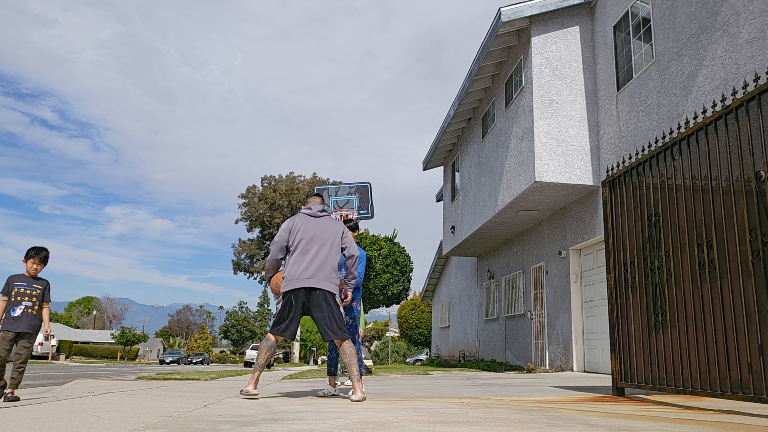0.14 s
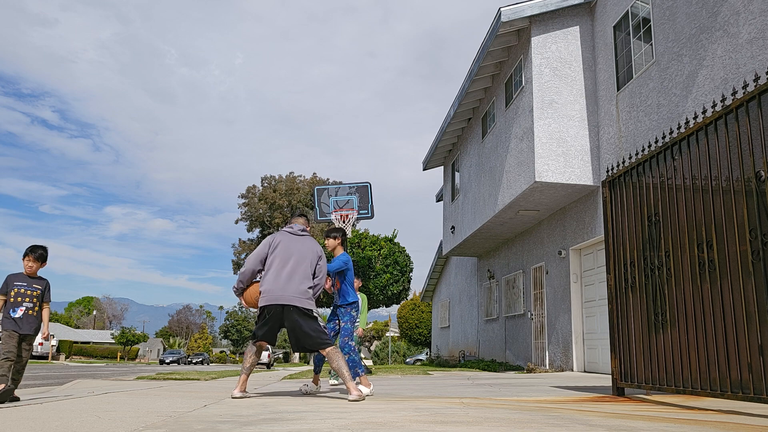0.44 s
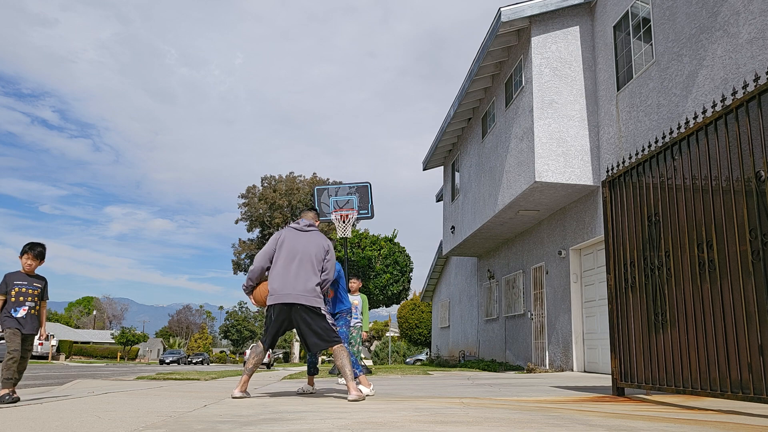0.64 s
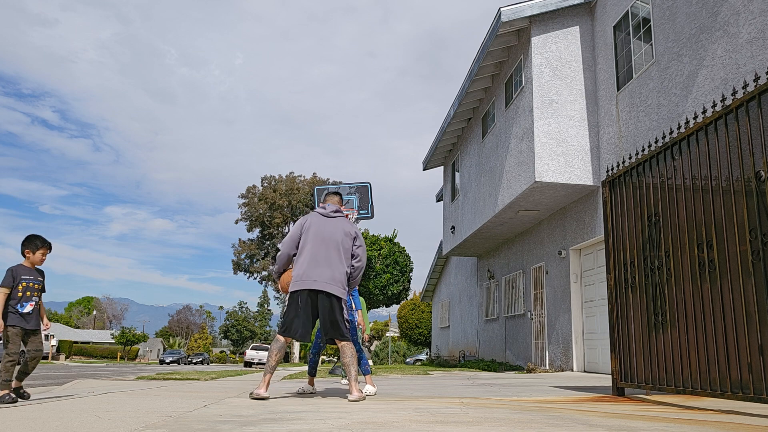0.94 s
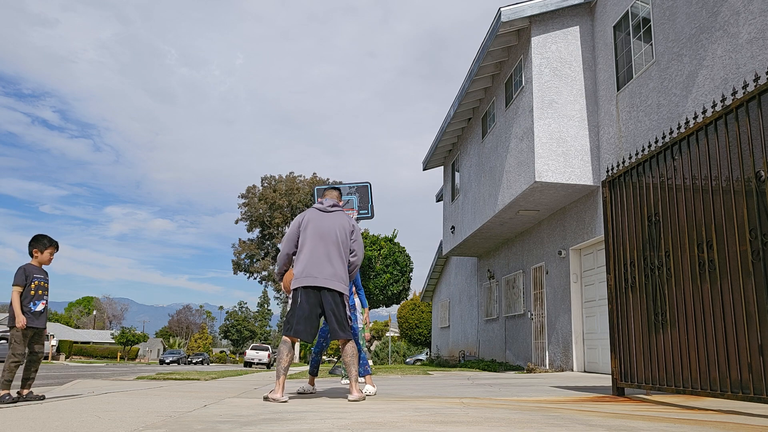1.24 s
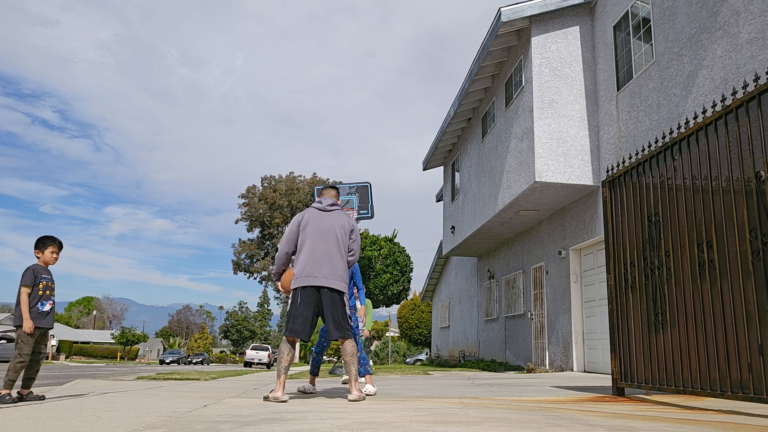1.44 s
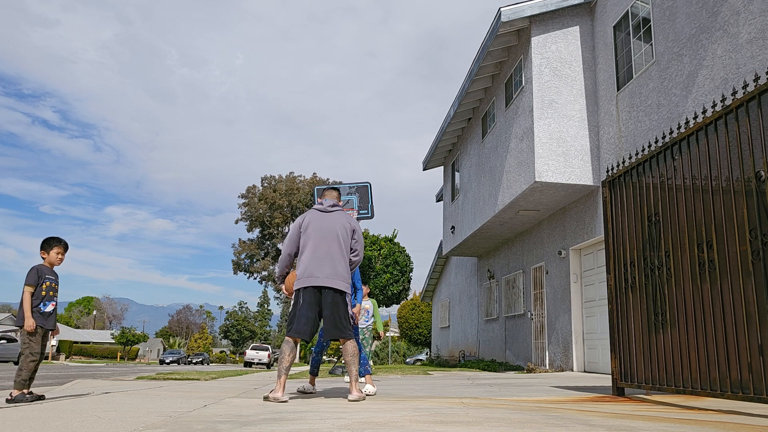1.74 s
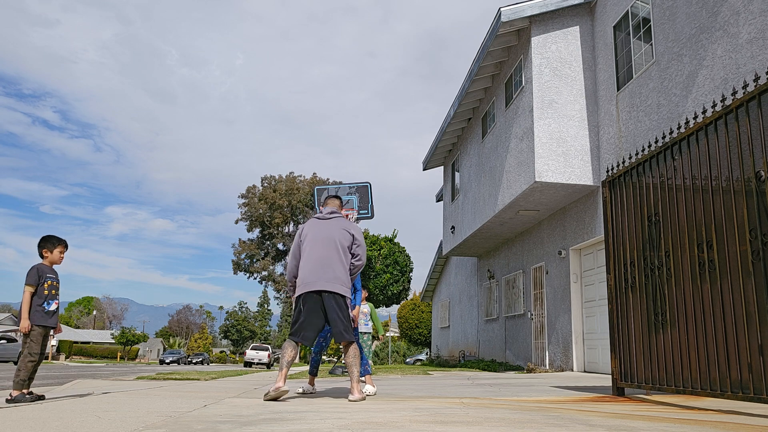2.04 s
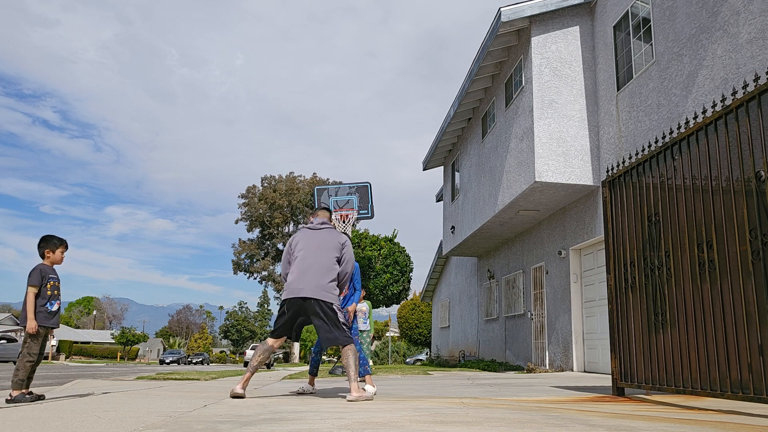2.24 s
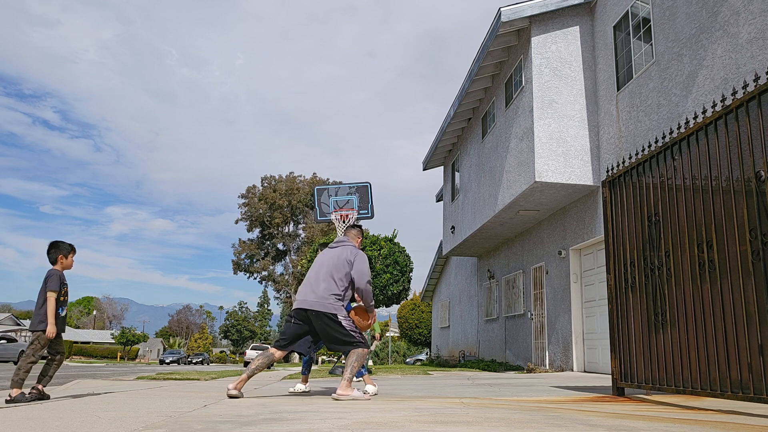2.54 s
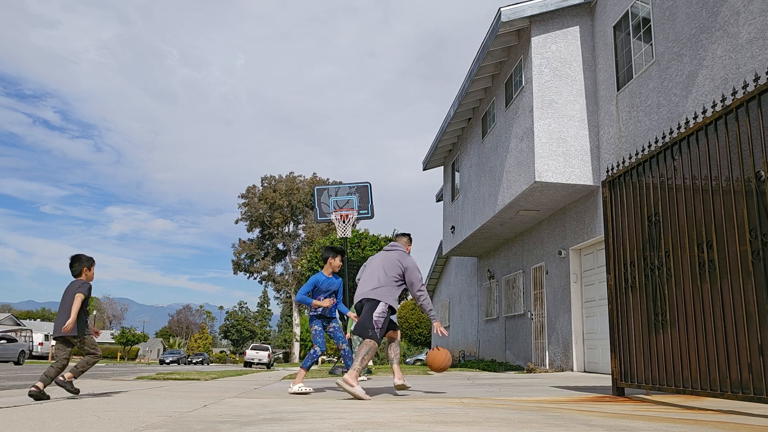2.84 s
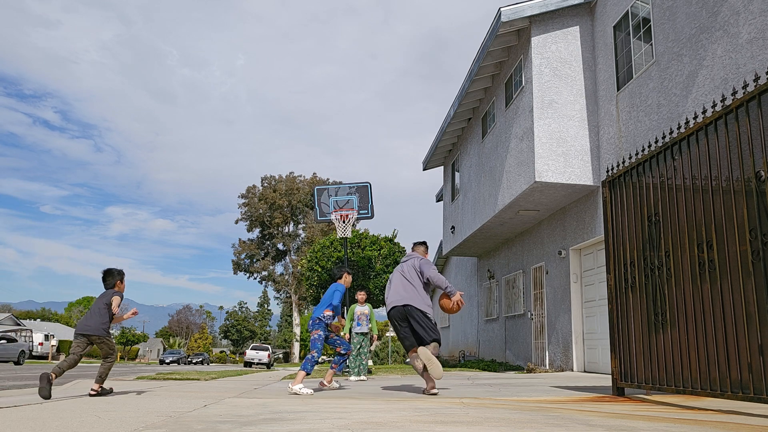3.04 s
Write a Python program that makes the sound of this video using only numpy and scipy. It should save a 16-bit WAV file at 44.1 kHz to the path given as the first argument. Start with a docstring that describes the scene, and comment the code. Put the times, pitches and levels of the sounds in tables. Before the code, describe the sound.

Sandals shuffle on a gritty driveway, then one sharp basketball bounce, with traffic rumbling far off.

```python
"""A basketball bounces once on a concrete driveway beside a house: its skin cracks, its body thumps,
the air inside rings, and walls and fence echo. Before and around it the players shuffle, their sandals
dragging grit and slapping the slab. Down the street an engine drones, changes gear and slowly speeds up
over traffic rumble, a hum and a faint whine. A camera on the ground hears it all through two close
microphone ports."""
import sys
import numpy as np
from scipy import signal
from scipy.fft import rfft, irfft
from scipy.io import wavfile
from scipy.ndimage import uniform_filter1d

SR = 44100
rng = np.random.default_rng(int(sys.argv[2]) if len(sys.argv) > 2 else 0)


def generate_wav(sig):
    """Save sig (samples, or channels by samples) to the path in sys.argv[1] as 16-bit PCM at SR."""
    pcm = np.round(np.clip(np.atleast_2d(sig).T, -1, 1) * 32767).astype(np.int16)
    wavfile.write(sys.argv[1], SR, pcm)


N = 141120
LEAD = 512  # samples of room ahead of each short sound
PORT_LAG_S = .00009  # sharp sounds reach the right port a little later


def undb(db):
    """Decibels to amplitude."""
    return 10 ** (np.asarray(db) / 20)


def bin_hz(size):
    """Frequencies of a spectrum, raised 1 Hz so that their logarithm is finite."""
    return np.arange(size // 2 + 1) * SR / size + 1


def bell(hz, centre_hz, octaves):
    """A resonance-shaped bump of height 1."""
    return np.exp(-(np.log2(hz / centre_hz) / octaves) ** 2)


def colour(x, table, extra_db=lambda hz: 0):
    """Filters x by (Hz, dB) points, scaled so that white noise keeps its rms, then by extra_db(hz)."""
    hz, points = bin_hz(x.shape[-1]), np.array(table)
    db = np.interp(np.log(hz), np.log(points[:, 0]), points[:, 1])
    gain = undb(db) / np.sqrt(np.mean(undb(2 * db)))
    return irfft(rfft(x) * gain * undb(extra_db(hz)), x.shape[-1])


def dull(x, hz):
    """Takes off the treble above hz."""
    return signal.sosfilt(signal.butter(2, hz, fs=SR, output="sos"), x)


def ports(mid, side):
    """Left and right from what both ports share (mid) and what differs (side)."""
    return np.array([mid + side, mid - side])


def lean_left(both, db):
    """Tips the balance db towards the left port."""
    return both * undb(np.array([[db], [-db]]) / 2)


def add(out, x, start_s):
    """Mixes x into out from start_s on."""
    i = int(round(start_s * SR))
    out[..., i:i + x.shape[-1]] += x[..., :N - i]


def walk(rate_hz):
    """Random levels held 1 / rate_hz seconds and smoothed twice; spread near 1."""
    hold = int(SR / rate_hz)
    steps = np.repeat(rng.standard_normal(N // hold + 1), hold)
    return 1.648 * uniform_filter1d(uniform_filter1d(steps, hold), hold)[:N]


def rings(t, modes):
    """Fading sines struck at t = 0."""
    return sum(undb(db - 60 * t / t60) * np.sin(2 * np.pi * hz * t) for hz, db, t60 in modes)


def tone(t, table, waver):
    """A thin tone that wanders in pitch and fades out beyond the ends of its table."""
    time_s, pitch_hz, level_db = np.array(table).T
    outside_s = np.maximum(time_s[0] - t, 0) + np.maximum(t - time_s[-1], 0)
    db = np.interp(t, time_s, level_db) - 150 * outside_s + 2 * walk(10)
    hz = np.interp(t, time_s, pitch_hz) * (1 + waver * walk(29.86))
    return np.sqrt(2) * undb(db) * np.sin(2 * np.pi * np.cumsum(hz) / SR)


# The engine harmonics that carry up the street: multiple of cycle_hz
ENGINE_HARMONICS = [3, 5, 6, 8, 10]
# Engine, down the street: time_s, cycle_hz, then level_db for each harmonic
ENGINE_RUN = [(0.0, 19, -59, -57.5, -59, -79, -53.5), (0.38, 19.9, -36.5, -50, -60, -53, -53.5),
              (0.56, 16.4, -43, -53.5, -52, -58, -60), (0.71, 18.5, -38.5, -44.5, -57, -65, -75),
              (0.77, 19.3, -33.5, -64, -51, -48, -55), (0.85, 19.1, -32.5, -55, -69, -54, -68),
              (0.89, 19.6, -35.5, -72, -73, -51, -66), (0.99, 19.8, -38, -56, -71, -49, -59),
              (1.1, 21, -39.5, -72, -69, -51, -62), (1.29, 16.8, -48, -45.5, -64, -64, -52.5),
              (1.53, 16.5, -38, -38, -60, -38.5, -79), (1.6, 16, -48, -58, -56, -44, -59),
              (1.83, 16.15, -39, -52.5, -66, -46, -68), (2.31, 17.5, -51.5, -40.5, -41, -52.5, -64),
              (2.48, 17.3, -34, -46.5, -44, -48.5, -57), (2.57, 17.5, -40, -37, -62, -42, -73),
              (2.79, 17.1, -45, -41.5, -60, -45.5, -65), (2.84, 17.8, -40.5, -57, -64, -42.5, -52),
              (3.05, 18.0, -46, -35, -33.5, -41, -54), (3.2, 18.5, -59.5, -44, -48.5, -67, -73)]
def engine(t, waver=0.0061, flutter_db=2):
    """Harmonics of the engine cycle drone, dropping at the gear change and creeping up again."""
    time_s, cycle_hz, *levels_db = np.array(ENGINE_RUN).T
    turns = np.cumsum(np.interp(t, time_s, cycle_hz) * (1 + waver * walk(6.7))) / SR
    out = 0
    for multiple, db in zip(ENGINE_HARMONICS, levels_db):
        rms = undb(np.interp(t, time_s, db) + flutter_db * walk(12))
        out += np.sqrt(2) * rms * np.sin(2 * np.pi * (multiple * turns + rng.random()))
    return out


# Street traffic from the driveway, mid and side spectra: freq_hz, relative_db
TRAFFIC_MID_SPECTRUM = [(12, -52), (20, -28), (38, 1), (59, 2.5), (76, -5), (128, -4), (164, -10.5),
                        (337, -18.5), (367, -18.5), (398, -21), (457, -21), (1080, -35), (1350, -45),
                        (1550, -38.5), (2100, -42.5), (3100, -52.5), (4820, -50.5), (6500, -63),
                        (8500, -66), (15000, -91)]
TRAFFIC_SIDE_SPECTRUM = [(12, -38), (20, -4.5), (43, -3.5), (76, -8.5), (118, -11), (223, -25.5),
                         (286, -14), (398, -27.5), (525, -21), (1550, -28.5), (2100, -38.5), (5380, -47),
                         (15000, -77)]
# Its swell at the microphone: time_s, bass_gain_db, upper_gain_db
TRAFFIC_SWELL = [(0, -3, -0.5), (.6, -1.5, 1.5), (1.2, 5, 1.75), (1.8, 3, 3.5), (2.4, 3, 5.5),
                 (2.9, 6, 8.5), (3.2, 1, 10.5)]
def traffic(t, mid_db=-42.5, side_db=-55.5, flicker_db=0.5, bass_below_hz=220):
    """Traffic rumble: each octave flickers on its own, and the bass swells apart from the rest."""
    mid = undb(mid_db) * colour(rng.standard_normal(N), TRAFFIC_MID_SPECTRUM)
    side = undb(side_db) * colour(rng.standard_normal(N), TRAFFIC_SIDE_SPECTRUM)
    spectrum, octave = rfft(ports(mid, side)), np.log2(bin_hz(N))
    time_s, bass_db, upper_db = np.array(TRAFFIC_SWELL).T
    out = np.zeros((2, N))
    for centre in range(4, 15):
        band = irfft(spectrum * np.clip(1 - abs(octave - centre), 0, 1), N)
        swell_db = np.interp(t, time_s, bass_db if 2 ** centre < bass_below_hz else upper_db)
        out += band * undb(swell_db - flicker_db * walk(6.95))
    return out


# Hum from the street, alike in both ports: time_s, pitch_hz, level_db
STREET_HUM = [(0.249, 271.4, -57), (0.751, 278.1, -66.5), (0.902, 274, -64), (1.1, 270, -51),
              (1.347, 276, -57.5), (1.65, 283.8, -56), (1.9, 292, -57), (2.3, 293, -57.5)]
def hum(t):
    """A low, wavering hum that drifts upward."""
    return tone(t, STREET_HUM, waver=0.0193)


# Grit on concrete, heard at ground level, mid and side spectra: freq_hz, relative_db
GRIT_MID_SPECTRUM = [(650, -7), (1100, -10), (1300, -11.5), (1550, -5.5), (2090, -3.5), (2400, -9.5),
                     (3180, -8), (3700, -2), (4960, -1.5), (5700, -6), (6400, -12.5), (6650, -34),
                     (6900, -13), (8000, -14), (9100, -11), (9600, -23.5), (11000, -30.5), (13000, -24.5),
                     (15500, -39)]
GRIT_SIDE_SPECTRUM = [(650, -31), (1100, -15.5), (1360, -15), (2140, -8), (3200, -10), (3800, -4),
                      (4900, -2), (5700, -5), (6400, -16), (6650, -23.5), (6900, -8), (8000, -12),
                      (9100, -9.5), (9600, -24), (11600, -25), (13000, -34.5), (15500, -27)]
def grit(mid, side, extra_db=lambda hz: 0, side_db=-2.5):
    """Gives a pair of signals the bright colour of grit under a sole."""
    return ports(colour(mid, GRIT_MID_SPECTRUM, extra_db),
                 undb(side_db) * colour(side, GRIT_SIDE_SPECTRUM, extra_db))


# Sandals scuffing the driveway: start_s, rise_s, length_s, level_db, swell_db (over the length),
# low_gain_db, high_gain_db, resonance_hz, resonance_db
SANDAL_SCUFFS = [(.288, 0.0015, 0.022, -52.5, 8, 1.5, 5.5, 4440, 0.5),
                 (0.316, 0.0078, 0.026, -67.5, -7, 12, 13, 5000, 2),
                 (0.364, .002, 0.0063, -77, -12, 5, 10, 5200, 5),
                 (0.456, .0013, 0.0056, -66, -1, -6, 13, 8650, 2.5),
                 (0.466, 0.017, 0.068, -64.5, 3, 4, -4, 4700, 0),
                 (0.55, .006, 0.042, -64, 10, -2, 6.5, 5300, 7),
                 (0.594, 0.0078, .035, -66, -6, 5.5, 4, 3500, 5),
                 (0.686, 0.0035, 0.023, -75.5, -1.5, 2, -2, 8450, 3),
                 (0.798, 0.036, .085, -65.5, 5, -8, 2, 3660, 4),
                 (0.878, 0.0055, .063, -57.5, 6.5, 1.5, 2.5, 4770, 0),
                 (.948, 0.0083, 0.088, -60, 1.5, -1.5, 10, 5000, 7),
                 (1.032, 0.013, 0.036, -51.5, -7.5, 0, 7.5, 5000, 3.5),
                 (1.053, 0.02, 0.062, -54, 3, -5, 4, 4930, 8),
                 (1.105, 0.011, 0.051, -50, -2, -9, 2.5, 5400, 7),
                 (1.129, 0.012, 0.05, -57.5, -6, 4.5, -0.5, 3560, -2),
                 (1.384, 0.0038, 0.041, -72, -4, 5, -4, 3820, 7),
                 (1.561, 0.0072, 0.037, -78, -8, 10, 7, 4802, 8),
                 (1.706, 0.008, .016, -75, -14, -5, 4, 5000, -1),
                 (1.829, 0.0026, 0.015, -55.5, -.5, -8, 2, 4200, 6.5),
                 (1.988, 0.0023, 0.0091, -69.5, -4, 1, -9, 5050, 10),
                 (1.999, .01, 0.13, -78, 6, 12, -1, 4600, 2), (2.152, .02, .045, -68, 1, 9, -2, 4400, 0),
                 (2.193, 0.0064, 0.019, -58, 4, -15, 3.5, 5000, 2.5),
                 (2.264, .02, .07, -60.5, 4, 5.5, 2, 4770, -2),
                 (2.338, 0.013, .025, -48, -9, 1.5, 12, 7400, -1),
                 (2.366, .004, 0.037, -65.5, -10, 10, 7, 4660, 2),
                 (2.448, 0.02, 0.08, -65, 8, 10.5, 5, 2120, 4),
                 (2.506, 0.033, 0.095, -57, -7.5, 6.5, -1, 3580, 6),
                 (2.599, 0.0087, 0.031, -59.5, 5, 9, 3, 1800, 8),
                 (2.629, 0.0052, .016, -48.5, -16, 8, -10, 5030, 3),
                 (2.644, 0.0058, 0.033, -57.5, 1, -1, 3.5, 1840, 10),
                 (2.676, 0.013, 0.045, -54, -3.5, 0, 11, 13000, 9),
                 (2.844, 0.013, 0.13, -58.5, 12, 9, 5, 4820, 0),
                 (3.005, 0.012, 0.03, -53.5, -10, 12, 0, 5600, 4.5),
                 (3.099, 0.028, 0.058, -61, -9, 8, 2.5, 5300, 4),
                 (3.151, 0.011, 0.051, -57, 10, 5, 1, 3740, 6.5)]
def scuffs(grains_per_s=261, scatter_db=1.5, ring_db=3, ring_spacing_hz=120.9,
           slab_t60_s=0.073, yard_db=-13.5, yard_t60_s=0.26):
    """Grit dragged under a sole: uneven hiss that rings at chance resonances of sole and slab."""
    out, size = np.zeros((2, N)), 16384
    t = (np.arange(size) - LEAD) / SR
    for start_s, rise_s, length_s, db, swell_db, low_db, high_db, peak_hz, peak_db in SANDAL_SCUFFS:
        grains = np.interp(t * grains_per_s, np.arange(300), rng.standard_normal(300))
        attack = np.clip(t / rise_s, 0, 1) ** 2
        drag = undb(db + swell_db * (np.clip(t / length_s, 0, 1) - .5) + scatter_db * grains)
        past_s = np.maximum(t - length_s, 0)
        tail = np.maximum(undb(-60 * past_s / slab_t60_s), undb(yard_db - 60 * past_s / yard_t60_s))
        mid, side = attack * drag * tail * rng.standard_normal((2, size))
        resonances = rng.standard_normal(400)

        def shape_db(hz):
            shelves = np.interp(hz, [2200, 2600, 6200, 7000], [low_db, 0, 0, high_db])
            ripple = ring_db * np.interp(hz / ring_spacing_hz, np.arange(resonances.size), resonances)
            return shelves + ripple + peak_db * bell(hz, peak_hz, octaves=0.13)

        add(out, lean_left(grit(mid, side, shape_db), db=1), start_s - LEAD / SR)
    return out


# Single grains underfoot on the driveway: start_s, pulse_db
GRIT_TICKS = [(.2885, -35), (.3415, -44), (.3722, -43.5), (.3765, -49), (0.694, -45), (.8815, -37),
              (0.896, -34), (0.9584, -35), (1.04, -27), (1.424, -47), (1.8328, -49), (1.994, -49),
              (2.0565, -50), (2.074, -51), (2.179, -42), (2.2038, -43), (2.3535, -37), (2.38, -40),
              (2.4075, -49), (2.4627, -39), (2.6143, -33), (2.6375, -33), (2.645, -37), (3.0105, -29)]
def ticks():
    """A grain snaps under a sole: one sharp pulse with the colour of grit."""
    out, size = np.zeros((2, N)), 2048
    hz = np.fft.rfftfreq(size, 1 / SR)
    pulse = lambda late_s: irfft(np.exp(-2j * np.pi * hz * (LEAD / SR + late_s)), size)
    click = grit(pulse(0), pulse(PORT_LAG_S))
    for start_s, db in GRIT_TICKS:
        add(out, undb(db) * click, start_s - LEAD / SR)
    return out


# Whine from the street, alike in both ports: time_s, pitch_hz, level_db
STREET_WHINE = [(1.0, 1647, -91), (1.034, 1610, -67.5), (1.487, 1538, -75), (1.518, 1667, -87),
                (1.57, 1516, -83), (1.701, 1554, -91)]
def whine(t):
    """A faint high whine that comes and goes."""
    return tone(t, STREET_WHINE, waver=0.00644)


# Sandals slapping the slab: start_s, level_db, pitch_hz, t60_s
SANDAL_SLAPS = [(2.6295, -43, 340, 0.012), (3.0223, -23, 543, 0.024)]
def slaps():
    """A short hollow knock as a sandal lands flat."""
    out, t = np.zeros((2, N)), np.arange(4096) / SR
    for start_s, db, hz, t60 in SANDAL_SLAPS:
        modes = [(hz, db, t60), (hz * 1.6, db - 7, t60 * 0.34), (hz / 2.2, db - 3, t60)]
        add(out, rings(t, modes), start_s)
    return out


# Ball skin on concrete, heard at ground level, mid and side spectra: freq_hz, relative_db
SKIN_MID_SPECTRUM = [(710, 0), (1200, -6.5), (1520, -2.5), (2090, 0), (3320, -10), (4240, -7), (5730, -4),
                     (6240, -8), (7810, -13), (9080, -12), (9990, -31), (13100, -26), (15500, -49)]
SKIN_SIDE_SPECTRUM = [(710, -19), (1200, 3), (1960, -7), (2430, -12), (3430, -11), (4070, -10), (4880, -9),
                      (5610, -1), (6650, -12), (8700, -6), (10100, -21), (12900, -21), (15500, -41)]
def skin_noise(envelope, extra_db=lambda hz: 0, level_db=-22, side_db=-2):
    """A burst of noise with the colour of the ball's skin hitting concrete."""
    mid = colour(envelope * rng.standard_normal(envelope.size), SKIN_MID_SPECTRUM, extra_db)
    side = colour(envelope * rng.standard_normal(envelope.size), SKIN_SIDE_SPECTRUM, extra_db)
    return undb(level_db) * ports(mid, undb(side_db) * side)


# Snap of the skin, straight to the microphone: pitch_hz, peak_db
SKIN_SNAP = [(4460, -7.5), (8450, -30), (2140, -15.5), (13000, -41)]
def snap(t, late_s=.0009, half_width_s=.00045):
    """The skin snaps in one tiny burst of tones, reaching the left port first."""
    port_t = t - late_s - np.array([[0], [PORT_LAG_S]])
    tones = sum(undb(db) * np.cos(2 * np.pi * hz * port_t) for hz, db in SKIN_SNAP)
    return np.exp(-(port_t / half_width_s) ** 2) * tones


# Air ringing inside the ball: pitch_hz, level_db, t60_s
BALL_AIR_MODES = [(490, -33, 0.099), (815, -31, 0.079), (975, -29, 0.055), (1440, -27, 0.054),
                  (1860, -34, 0.09), (2073, -49, 0.72), (2065, -63, .5), (2630, -26.5, 0.028),
                  (3810, -33, 0.052), (4300, -29.5, 0.039)]
def crack(t, chatter_db, chatter_t60_s, air_db=0, rise_s=0.0018, fall_s=0.00055):
    """The skin strikes the concrete, snaps and chatters, and sets the air inside ringing."""
    after = np.maximum(t, 0)
    spike = np.exp(np.where(t < rise_s, (t - rise_s) / rise_s, (rise_s - t) / fall_s))
    strike = skin_noise(spike)
    brighter_db = lambda hz: np.log2(np.clip(hz, 1000, 9000) / 3000)  # 1 dB per octave
    chatter = skin_noise((t > 0) * undb(chatter_db - 60 * after / chatter_t60_s), brighter_db)
    return strike + chatter + undb(air_db) * rings(after, BALL_AIR_MODES) + snap(t)


def thump(t, gain_db=1.2, late_s=0.00376, rise_s=0.007, fall_s=0.004,
          start_hz=218, end_hz=69.1, sag_s=0.0075):
    """The squashed ball thumps, its pitch sagging as it leaves the ground."""
    after = np.maximum(t - late_s, 0)
    turns = end_hz * after + (start_hz - end_hz) * sag_s * (1 - np.exp(-after / sag_s))
    envelope = (1 - np.exp(-after / rise_s)) * np.exp(-after / fall_s)
    return 2 * undb(gain_db) * envelope * np.sin(2 * np.pi * turns)


def yard_tail(t, gain_db=-12.5, rise_s=0.01, t60_s=0.37):
    """The crack lingers in the yard as a duller wash."""
    after = np.maximum(t, 0)
    envelope = (1 - np.exp(-after / rise_s)) * undb(gain_db - 60 * after / t60_s)
    return dull(skin_noise(envelope), hz=5670)


def slab_thud(t, late_s=0.011, pitch_hz=71.5, level_db=-15, t60_s=0.098):
    """The slab answers the thump with one low note."""
    return rings(np.maximum(t - late_s, 0), [(pitch_hz, level_db, t60_s)])


# Walls and fence, as heard from the ground: delay_s, crack_gain_db, thump_gain_db, favoured_hz
WALL_ECHOES = [(0.0362, -30, -12, 5500), (0.0405, -26, -15, 1500), (0.049, -21, -15.5, 650),
               (.051, -25, -20, 3900), (.0552, -20, -32, 2000), (0.0598, -18.5, -19.5, 3900),
               (0.069, -28, -40, 3570), (0.106, -30.5, -34, 5600)]
def bounce(start_s=2.9048, favour_db=10):
    """The ball lands once; walls and fence throw it back, each echo favouring one band of the crack."""
    out, size = np.zeros((2, N)), 16384
    t = (np.arange(size) - LEAD) / SR
    body = thump(t)
    landing = yard_tail(t) + crack(t, chatter_db=-2.5, chatter_t60_s=0.07) + body + slab_thud(t)
    add(out, landing, start_s - LEAD / SR)
    for delay_s, crack_db, thump_db, favoured_hz in WALL_ECHOES:
        wall_gain = undb(favour_db * bell(bin_hz(size), favoured_hz, octaves=0.25))
        short_crack = crack(t, chatter_db=-3, chatter_t60_s=0.012, air_db=-6)
        reflected = dull(irfft(rfft(short_crack) * wall_gain, size), hz=11000)
        add(out, undb(crack_db) * reflected + undb(thump_db) * body, start_s + delay_s - LEAD / SR)
    return out


def scene():
    """The street in the distance; sandals and ball on the driveway."""
    t = np.arange(N) / SR
    street = engine(t) + hum(t) + whine(t) + traffic(t)
    return street + scuffs() + ticks() + slaps() + bounce()


def record(dry, low_cut_hz=32.7, top_hz=15900):
    """The camera's microphone: the left port is a little louder; the deepest bass and the top are cut."""
    low_cut = signal.butter(1, low_cut_hz, "high", fs=SR, output="sos")
    top_cut = signal.ellip(8, .2, 70, top_hz, fs=SR, output="sos")
    return signal.sosfilt(top_cut, signal.sosfilt(low_cut, lean_left(dry, db=1.02)))


dry = scene()
out = record(dry)
generate_wav(out)
```